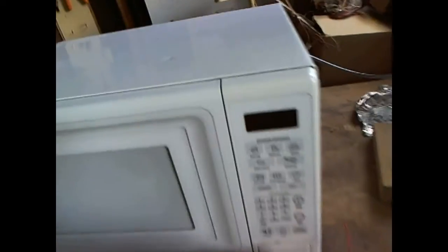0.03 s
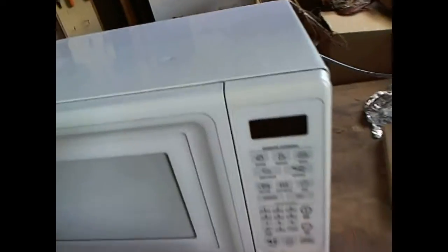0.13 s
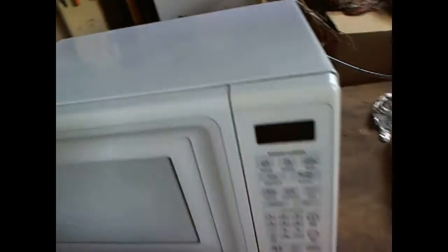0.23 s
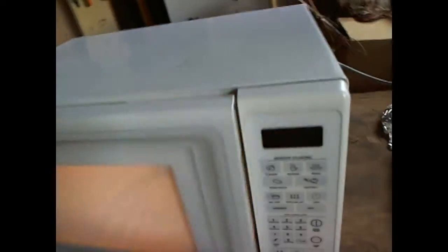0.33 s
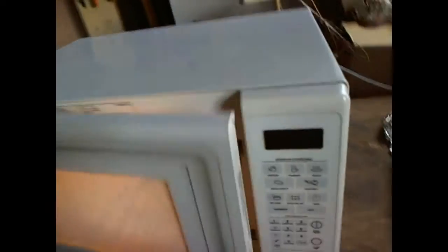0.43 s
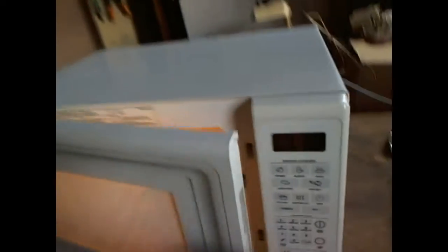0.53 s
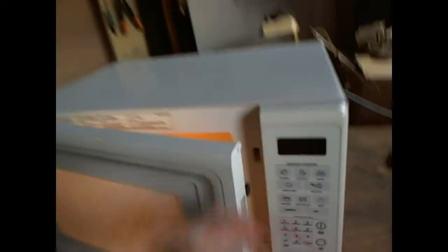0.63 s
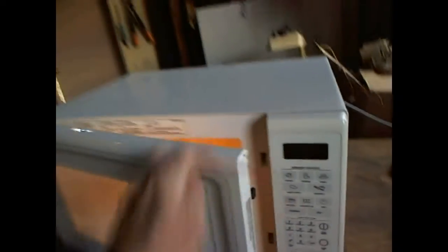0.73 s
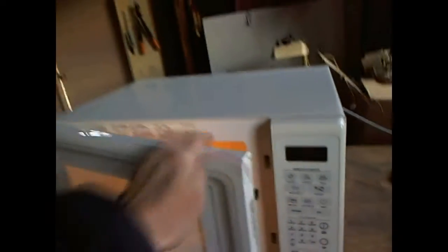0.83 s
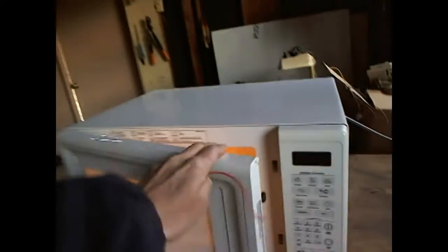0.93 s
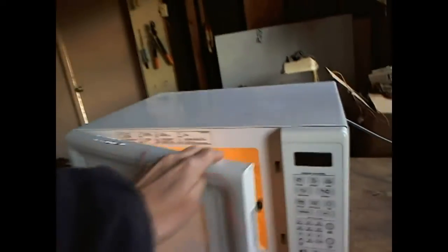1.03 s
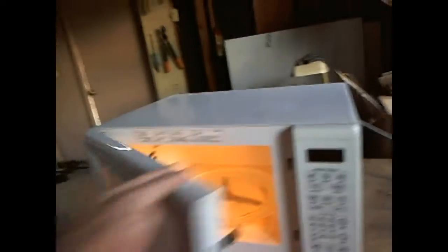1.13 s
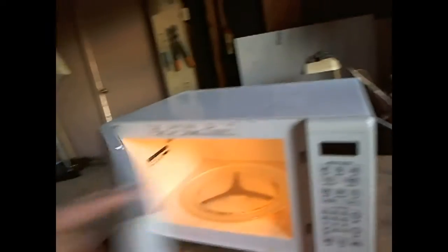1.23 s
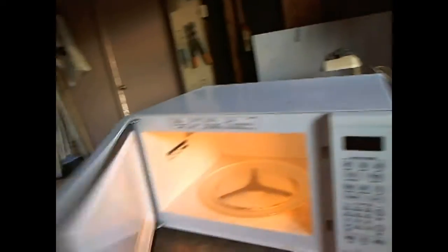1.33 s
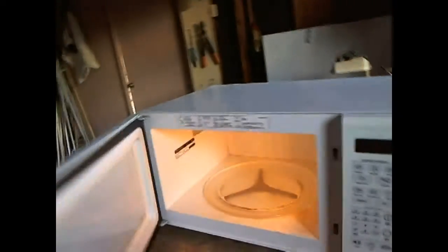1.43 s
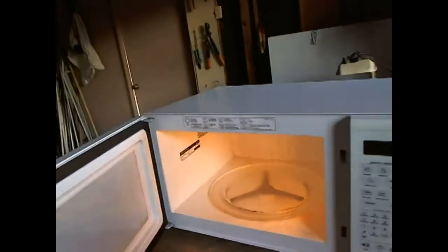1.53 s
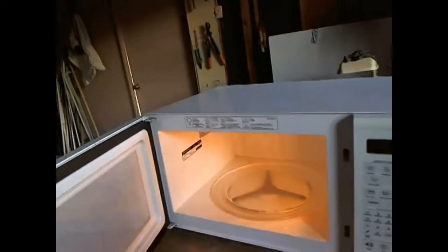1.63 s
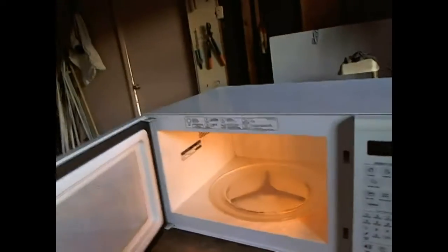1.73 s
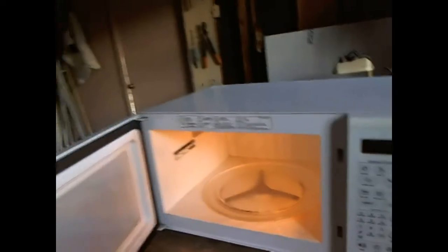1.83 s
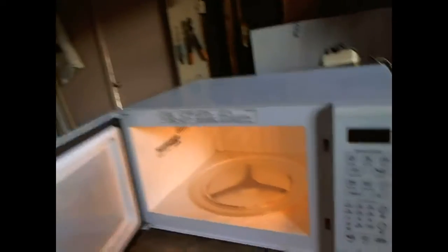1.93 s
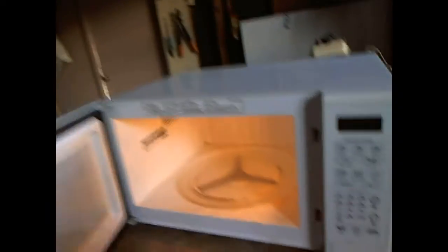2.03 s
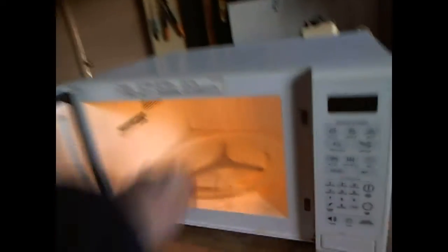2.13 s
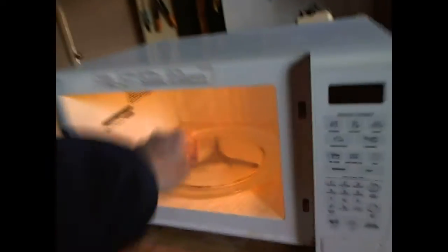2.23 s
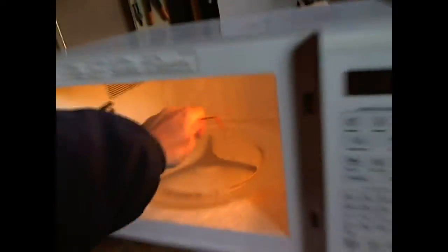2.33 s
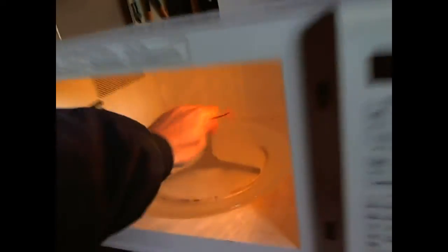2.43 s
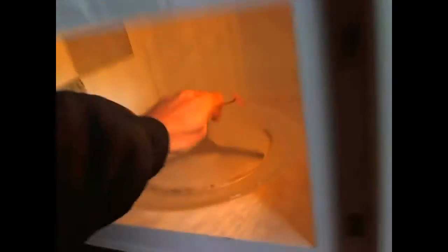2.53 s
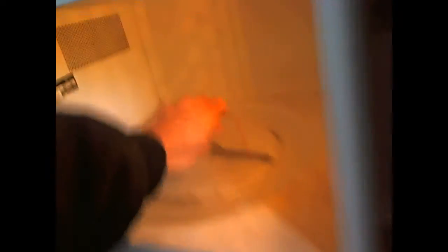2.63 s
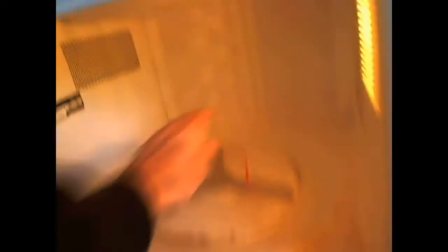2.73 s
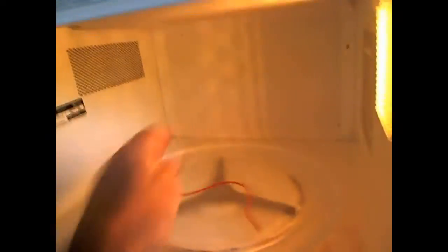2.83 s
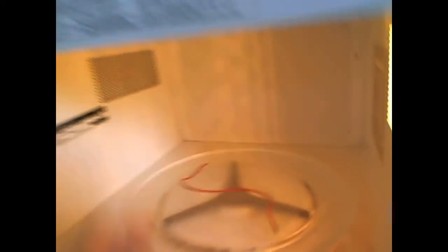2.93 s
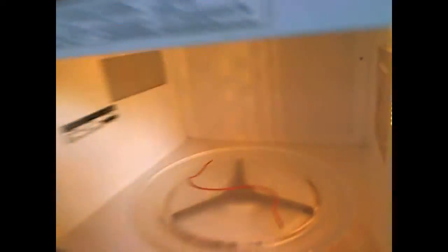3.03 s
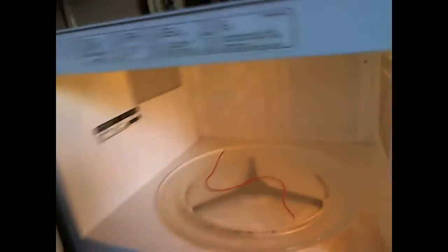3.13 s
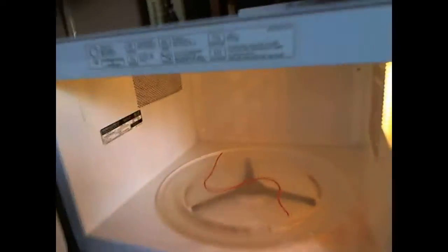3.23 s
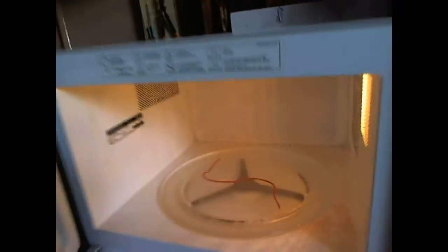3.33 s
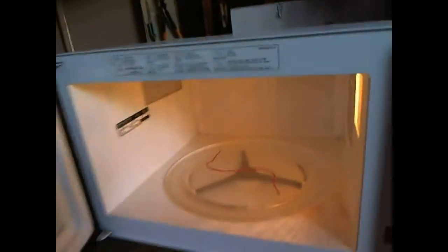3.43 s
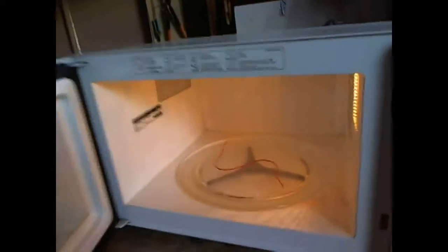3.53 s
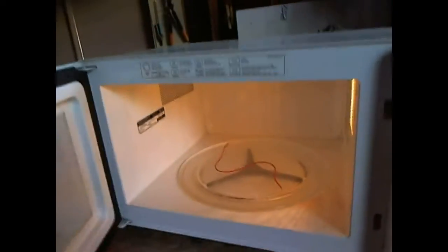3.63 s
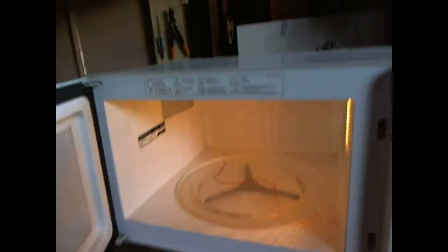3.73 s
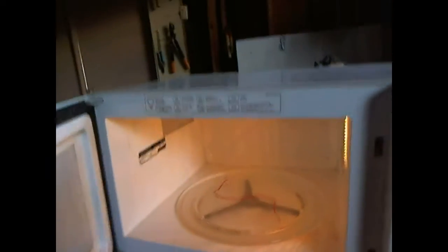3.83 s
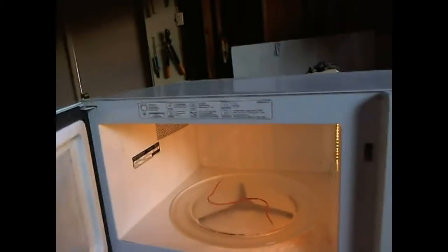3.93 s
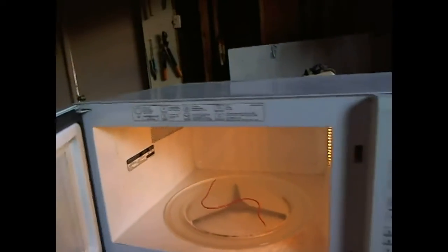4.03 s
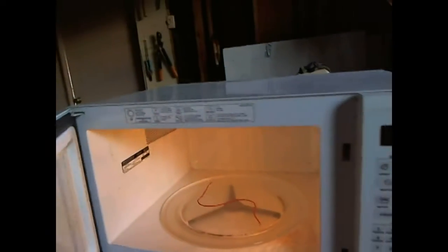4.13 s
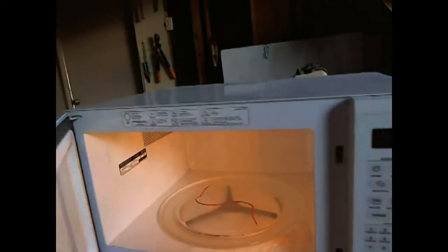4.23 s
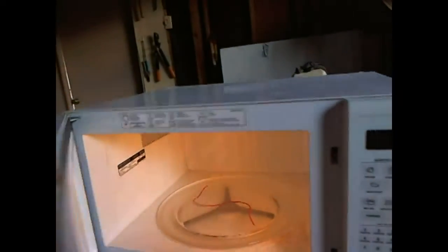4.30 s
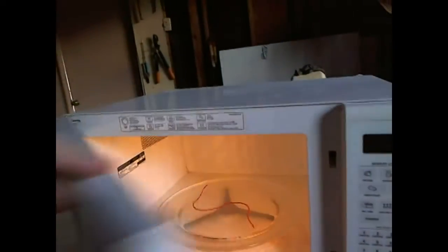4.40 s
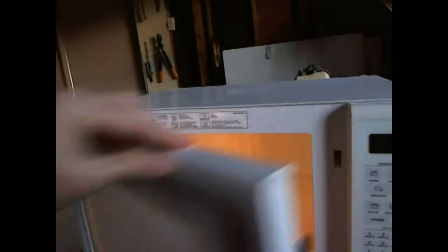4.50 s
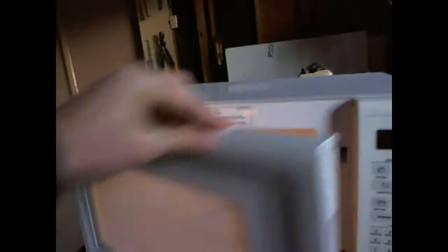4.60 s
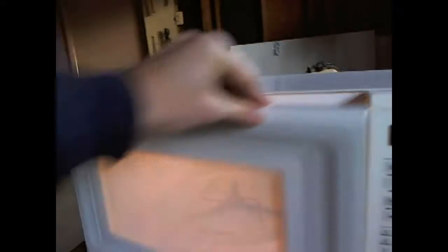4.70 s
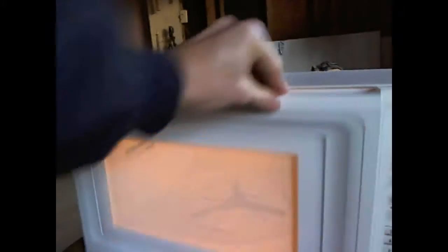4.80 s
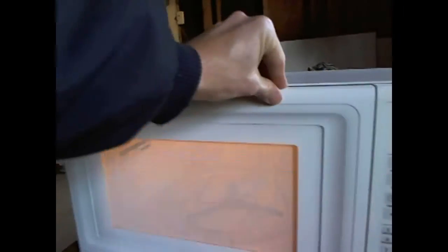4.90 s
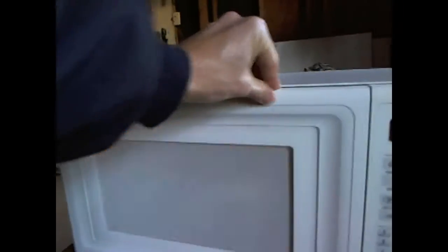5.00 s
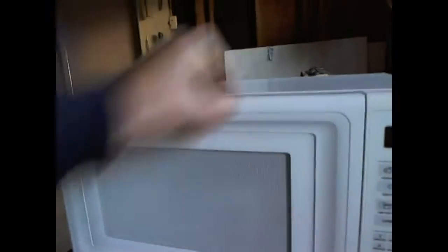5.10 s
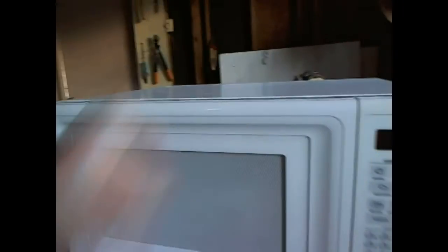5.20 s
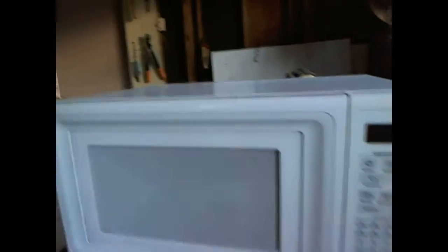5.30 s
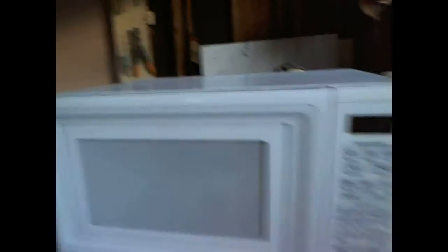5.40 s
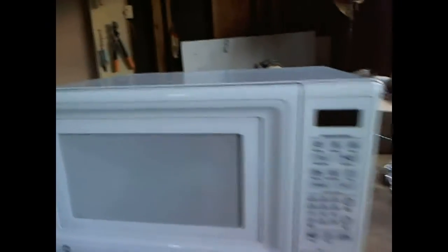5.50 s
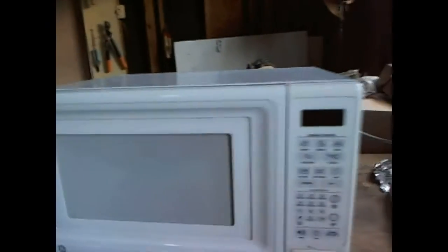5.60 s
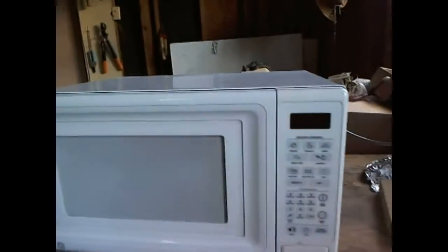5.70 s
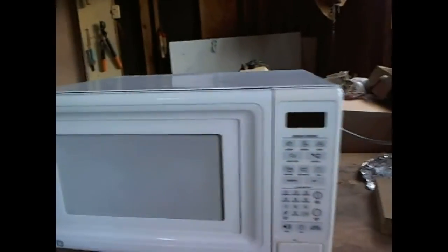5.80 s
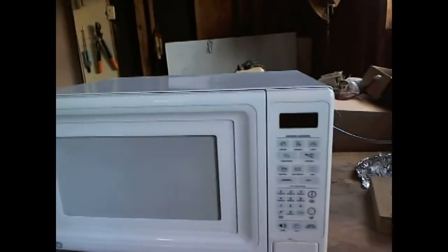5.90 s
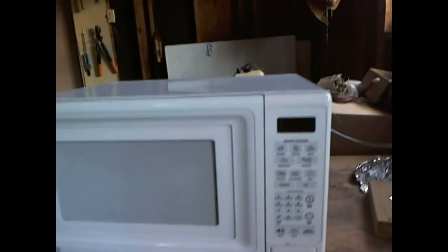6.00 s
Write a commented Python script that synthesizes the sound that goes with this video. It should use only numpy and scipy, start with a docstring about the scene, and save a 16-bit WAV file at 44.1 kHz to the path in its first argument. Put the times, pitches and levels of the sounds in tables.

```python
"""A garage bench with a microwave oven on it, close to a hand-held camera. The latch clicks, squeals and lets
the door spring open; the hinge groans, a hand makes the glass turntable clink, a foot steps back, and the door
is slammed. Knocks are bursts of noise plus ringing tones, squeaks are sliding tones with overtones, and cloth,
handling and the quiet room are coloured noise. The loudest blows overload the microphone."""
import sys
import numpy as np
from scipy import signal
from scipy.fft import rfft, irfft, next_fast_len
from scipy.io import wavfile
from scipy.ndimage import uniform_filter1d

SR = 44100
rng = np.random.default_rng(int(sys.argv[2]) if len(sys.argv) > 2 else 0)


def to_wav(s):
    """Save 16-bit WAV."""
    ch = np.atleast_2d(s).T  # columns
    pcm = np.round(np.clip(ch, -1, 1) * 32767)  # PCM
    wavfile.write(sys.argv[1], SR, pcm.astype(np.int16))


N = 266937
TIME = np.arange(N) / SR  # seconds
RING = TIME[:int(1.5 * SR)]  # time axis of one ringing sound, seconds
RELEASE_S = .619  # the latch hook snaps free

# The many close-packed tones of the oven case, as the colour of a noise.
# Each row: frequency in Hz, relative strength in dB per Hz.
CASE_COLOUR = [(30, -11.5), (80, -7), (160, -1), (330, -2.5), (600, 1), (1080, 2), (1700, -2.5),
               (2400, -4.5), (3600, -4.5), (5300, -8), (7000, -14.5), (10000, -26), (15000, -24.5)]


def undb(db):
    """Turn decibels into a gain."""
    return 10 ** (np.asarray(db) / 20)


def at_hz(table, hz):
    """Read a table of (Hz, value) rows at any frequency, on a logarithmic pitch axis."""
    table_hz, value = np.transpose(table)
    return np.interp(np.log(hz + 1e-9), np.log(table_hz), value)


def colour(x, spectrum, tilt_db=0):
    """Filter by a spectrum, made brighter or duller by a tilt in dB per octave around 1 kHz."""
    hz = np.fft.rfftfreq(len(x), 1 / SR)
    octaves = np.log2(np.clip(hz, 400, 8000) / 1000)  # the tilt stops at 400 and 8000 Hz
    gain = undb(at_hz(spectrum, hz) + tilt_db * octaves)
    return irfft(rfft(x) * gain, len(x))


def noise(spectrum, tilt_db=0, size=N):
    """Make coloured noise with an rms level of 1."""
    x = colour(rng.standard_normal(size), spectrum, tilt_db)
    return x / x.std()


def long_noise(spectrum, tilt_db=0):
    """Make coloured noise as long as the scene, at a length that filters quickly."""
    return noise(spectrum, tilt_db, size=next_fast_len(N))[:N]


def walk(rate):
    """Wander at random with a spread of 1, taking a new value about `rate` times a second."""
    step = int(SR / rate)
    x = np.repeat(rng.standard_normal(N // step + 1), step)
    x = uniform_filter1d(x, step)[:N]
    return x / x.std()


def fade(t60):
    """Die away freely, by 60 dB in t60 seconds."""
    return np.exp(-np.log(1000) * RING / max(t60, 1e-3))


def swell(s, rise, fall):
    """Grow to a gain of 1 at time s and die away again."""
    pace = np.where(TIME < s, rise, fall)
    return np.exp(-np.abs(TIME - s) / np.maximum(pace, 1e-4))


def add(track, s, sound):
    """Mix a sound in at time s."""
    i = int(s * SR)
    track[i:i + len(sound)] += sound[:N - i]


def mode_rings(modes):
    """Ring each natural tone (Hz, dB, t60) of a struck object as a decaying sine."""
    return np.array([undb(db) * fade(t60) * np.sin(2 * np.pi * hz * RING) for hz, db, t60 in modes])


def alternating(count):
    """Give neighbouring tones opposite signs, the same at every blow."""
    return (-1) ** np.arange(count)


def tail():
    """Blur a knock into the smooth echo of case and garage, with energy 1; the treble dies soonest."""
    # How long the echo lasts. Each row: frequency in Hz, t60 in seconds.
    echo_times = [(60, 0.5), (250, .6), (700, .55), (1500, 0.41), (4000, 0.32), (10000, .26)]
    hz = np.fft.rfftfreq(len(RING), 1 / SR)
    white = rfft(rng.standard_normal(len(RING)))
    centres, t60s = np.transpose(echo_times)
    echo = np.zeros(len(RING))
    for row, t60 in zip(np.eye(len(centres)), t60s):
        share = at_hz(np.c_[centres, row], hz)  # overlapping bands that add up to 1
        echo += irfft(white * share, len(RING)) * fade(t60)
    echo = echo * (1 - np.exp(-RING / 0.00093))  # soft start
    return echo / np.linalg.norm(echo)


def garage(x, wet_db):
    """Add the echo of case and garage to the direct sound."""
    return x + undb(wet_db) * signal.fftconvolve(x, tail())[:N]


def door():
    """Crack the plastic and ring the steel at every contact, as latch and door open and slam."""
    # Sheet-steel panels and oven cavity. Each row: frequency in Hz, relative level in dB, t60 in seconds.
    panel_modes = [(111, -14, .75), (223, -14, 1.0), (227, -19, .9), (246, -22, .75), (280, -27, .6),
                   (353, -21, .7), (373, -24, .7), (436, -18, .55), (491, -20, .7), (506, -11, .3),
                   (529, -23, .7), (548, -19, .7), (582, -16, .3), (653, -19, .9), (697, -24, .75),
                   (764, -15, .3), (915, -24, .55), (2772, -39, .9), (4027, -45, .9), (5001, -46, .9)]
    panels = undb(-2) * alternating(len(panel_modes)) @ mode_rings(panel_modes)
    click_cracks, click_rings = clicks(panels)
    blow_cracks, blow_rings = blows(panels)
    rings = click_rings + blow_rings + bench_jolts() + hook_and_spring()
    return garage(click_cracks + blow_cracks, wet_db=-10.5) + rings


def blows(panels):
    """Let heavy contacts scrape in, crack, thud in the hollow case, ring the panels and rattle."""
    # The latch gives, the door springs out and jumps, the hook snaps free; the hooks meet the case,
    # the door slams home. Each row: start in seconds, level in dB, brightness in dB per octave,
    # t60 of the crack in seconds, panel ring, thud and rattle in dB relative to the level,
    # rise of the scrape before it in seconds.
    heavy_blows = [(.479, -8.5, 1, .09, -14.5, -20, -12, .003),
                   (.493, -8, -1, .14, -17.5, -15.5, -14.5, .001),
                   (.551, -14, -4.5, .09, -6.5, -12, -10, .002),
                   (.619, -1.5, 0.5, .055, -19.5, -27, -15.5, .021),
                   (4.989, -10.5, 0.5, .1, -3, -9, -8, .0002), (5.053, 2, -1, 0.17, 3.5, -8, -7.5, .005)]
    cracks, rings = np.zeros(N), np.zeros(N)
    grain = undb(4 * walk(300))
    scrape = undb(-9) * grain * long_noise(CASE_COLOUR, tilt_db=-1.5)  # the hook sliding up to a blow
    for s, db, tilt_db, t60, ring_db, thud_db, rattle_db, rise in heavy_blows:
        cracks += undb(db) * swell(s, rise, 0) * scrape
        add(cracks, s, crack(db, tilt_db, t60))
        add(cracks, s, crack(db + thud_db, tilt_db=-11.5, t60=0.34, rise=.004))
        add(rings, s, undb(db + ring_db) * panels)
        for knock_s, knock_db, knock_tilt_db in rebounds(s, db + rattle_db, tilt_db):
            add(cracks, knock_s, crack(knock_db, knock_tilt_db, t60=.07, size=8192))
    return cracks, rings


def crack(db, tilt_db, t60, rise=.0003, size=16384):
    """Set the close-packed tones of the case going with one contact: a quickly fading noise."""
    envelope = fade(t60) * (1 - np.exp(-RING / rise))
    return undb(db) * noise(CASE_COLOUR, tilt_db, size=size) * envelope[:size]


def rebounds(s, db, tilt_db, count=9):
    """Rattle the door after a blow: uneven, ever weaker and duller knocks (s, dB, brightness)."""
    gap_s, gap_spread, scatter_db = .018, .2, 1.0  # the spread is in gaps
    weaken_db_per_s, dull_db_per_s = -140, -56  # the second one changes the brightness
    chance = rng.standard_normal((count, 2))
    late = gap_s * np.maximum(np.arange(1, count + 1) + gap_spread * chance[:, 0], 0)
    return [(s + t, db + weaken_db_per_s * t + scatter_db * luck, tilt_db + dull_db_per_s * t)
            for t, luck in zip(late, chance[:, 1])]


def clicks(panels):
    """Knock the case lightly, so that it cracks softly and rings the panels a little."""
    # Knocks from button, lever and fingers, dull late knocks of the opened door, and the glass plate
    # landing. Each row: start in seconds, level in dB, brightness in dB per octave, t60 in seconds.
    light_knocks = [(.114, -38, -4.5, 0.078), (.222, -36, -1.5, 0.064), (.236, -15.5, -5, 0.059),
                    (.259, -21, -3.5, 0.043), (.325, -32.5, -3, 0.052), (0.346, -32, -.5, .07),
                    (.357, -14, -1, 0.062), (.386, -29, -4.5, 0.096), (.403, -16.5, 0.5, .045),
                    (.414, -18.5, 5, .035), (.432, -16.5, 2.5, 0.044), (.674, -20.5, -11, 0.043),
                    (.732, -26.5, -12.5, 0.045), (2.416, -30, 0.5, .025), (2.852, -19, -3.5, .06),
                    (4.022, -37, 1, .01)]
    cracks, rings = np.zeros(N), np.zeros(N)
    for s, db, tilt_db, t60 in light_knocks:
        add(cracks, s, crack(db, tilt_db, t60, rise=0.041 * t60))
        add(rings, s, undb(db - 13) * panels)
    return cracks, rings


def bench_jolts():
    """Rock the whole oven on the bench, which answers with low ringing tones."""
    # Each row: start in seconds, level in dB.
    jolts = [(.474, -21.5), (.553, -16), (.598, -19), (5.048, -9), (5.122, -9), (5.147, -9.5)]
    # The bench's own tones. Each row: frequency in Hz, relative level in dB, t60 in seconds.
    bench_modes = [(62.4, -8.5, .27), (112.1, -6.5, 0.042), (129.4, -6, 0.21), (186, -9, .16)]
    out, bench = np.zeros(N), mode_rings(bench_modes).sum(axis=0)
    for s, db in jolts:
        add(out, s, undb(db) * bench)
    return out


def hook_and_spring(spring_db=-42, spring_hz=544, spring_t60=5.0):
    """Ring the latch hook as it snaps back, and let the door spring sing on after the release."""
    # The latch hook. Each row: frequency in Hz, relative level in dB, t60 in seconds.
    hook_modes = [(1076, -9, 0.08), (3400, -11.5, 0.065), (5340, -7, 0.055)]
    out = np.zeros(N)
    add(out, RELEASE_S, undb(-1) * mode_rings(hook_modes).sum(axis=0))
    spring_gain = undb(spring_db - 60 * TIME / spring_t60)
    add(out, RELEASE_S, spring_gain * np.sin(2 * np.pi * spring_hz * TIME))
    return out


def turntable(place_db=3, rock_db=1.2):
    """Knock glass on its rollers at changing spots; each contact drives its own range of tones."""
    # The glass plate. Each row: frequency in Hz, relative level in dB, t60 in seconds if left undamped.
    glass_modes = [(506, -17, .27), (786, -22, .12), (1134, -15, .46), (1969, -17, .42), (1989, -24, .25),
                   (2385, -42, .3), (3388, -30, .2), (4222, -21, .25), (4395, -20, .32), (4545, -22.5, .25),
                   (5548, -25, .25), (5811, -25, .45), (6121, -23, .25), (6800, -29, .12), (7030, -25, .22),
                   (7370, -33, .2), (8016, -26, .13), (8690, -25, .13), (9060, -35, .12), (9665, -33, .13),
                   (9970, -29, .16), (10470, -28, .12), (11600, -28, .1), (12090, -24, .15),
                   (12400, -30, .14), (13400, -24, .1)]
    # The plastic roller ring under it. Each row: frequency in Hz, relative level in dB, t60 in seconds.
    roller_modes = [(2950, -7, .08), (3060, 0, .12), (3125, -5, .08)]
    # The plate rocks. Each row: start in seconds, glass level in dB, lowest pitch driven in Hz,
    # brightness in dB per octave, t60 of the contact's damping in seconds, roller level in dB.
    clinks = [(2.667, -13, 1400, -3.5, 0.29, -25), (2.705, -19, 700, 0, .4, -38.5),
              (2.771, -18.5, 2000, -4, 0.93, -27.5), (2.835, 6, 1660, 3, 0.15, -12.5),
              (2.851, 3, 400, 2, 2.5, -40), (2.915, -9, 1300, 0, 0.32, -26),
              (2.990, 0.5, 2550, 0.5, .7, -15)]
    ringing, ticks = np.zeros(N), np.zeros(N)
    hz = np.array(glass_modes)[:, 0]
    # each tone wavers as the plate rocks
    waver = np.array([walk(81)[:len(RING)] for _ in hz])
    glass = mode_rings(glass_modes) * undb(rock_db * waver)
    rollers = mode_rings(roller_modes).sum(axis=0)
    contact = 1 - np.exp(-RING / 0.0014)  # soft start
    spots = rng.random((len(clinks), len(hz))) - .5  # where the plate is touched
    for (s, db, lowest_hz, tilt_db, t60, rollers_db), spot in zip(clinks, spots):
        high_pass = 1 / np.hypot(1, (lowest_hz / hz) ** 3)
        strength = undb(db + tilt_db * np.log2(hz / 3000) + place_db * spot)
        drive = alternating(len(hz)) * high_pass * strength
        add(ringing, s, contact * (drive @ glass * fade(t60) + undb(rollers_db) * rollers))
        tick = noise(CASE_COLOUR, tilt_db=0.5 + tilt_db, size=len(RING))
        add(ticks, s, undb(db - 24) * contact * fade(0.094) * tick)
    return ringing + garage(ticks, wet_db=-2.5)


def squeaks():
    """Drag the latch hook over its catch, groan the hinge, and judder a sole turning on the floor."""
    # Each row: start in seconds, attack in seconds, time to the peak in seconds, peak level in dB,
    # swell in dB per second, release in dB per second, first pitch in Hz, last pitch in Hz,
    # middle of the slide in seconds after the start, slide time in seconds.
    slips = [(.424, .008, 0.05, -7.5, 190, 430, 1661, 1494, .040, 0.0089),
             (1.122, .01, 0.048, -31, 325, 202, 408, 384.7, 0.016, 0.0089),
             (3.979, 0.0083, 0.013, -33, 18, 171.5, 1110, 1240, 0.0201, .028)]
    # Overtones of the latch. Each row: multiple of the pitch, relative level in dB.
    latch_tones = [(1, 0.5), (2, -2.5), (3, -9), (4, -12), (5, -24.5), (6, -26)]
    # Overtones of the hinge. Each row: multiple of the pitch, relative level in dB.
    hinge_tones = [(1, -1.5), (2, -3.5), (3, -8), (4, -18.5), (5, -28)]
    # Overtones of the sole. Each row: multiple of the pitch, relative level in dB.
    shoe_tones = [(1, -2.5), (2, -9)]
    latch = squeak(slips[0], latch_tones, jitter=0.008, flutter_db=1.1, edge=.15, rasp_db=-17.5, body_db=14)
    hinge = squeak(slips[1], hinge_tones, jitter=0.014, flutter_db=3.0, edge=.05, rasp_db=-29)
    shoe = squeak(slips[2], shoe_tones, jitter=0.0259, flutter_db=4.5, edge=1.6, rasp_db=-23.5, chatter=0.46)
    return garage(latch, wet_db=-19.5) + garage(hinge, wet_db=-10.0) + garage(shoe, wet_db=-13)


def squeak(event, tones, jitter, flutter_db, edge, rasp_db, chatter=0, chatter_hz=67,
           body_db=0, body_hz=3020, body_width_hz=110):
    """Stick and slip: a raspy tone swells, slides in pitch and lets go; force brings out overtones."""
    start, attack, to_peak, db, swell_db, release_db, first_hz, last_hz, middle, slide = event
    age = TIME - start
    slid = (1 + np.tanh((age - middle) / slide)) / 2  # from 0 to 1
    hz = (first_hz + (last_hz - first_hz) * slid) * (1 + jitter * walk(900))  # unsteady slips
    phase = 2 * np.pi * np.cumsum(hz) / SR
    slope_db = np.where(age < to_peak, swell_db, release_db)
    force = np.clip(age / attack, 0, 1) * undb(db - np.abs(age - to_peak) * slope_db)
    force = force * (1 - chatter * np.cos(2 * np.pi * chatter_hz * age))
    press = force / force.max()
    tone = np.zeros(N)
    for k, tone_db in tones:
        # only hard rubbing wakes the resonance
        boost_db = np.sqrt(press) * body_db / (1 + ((k * hz - body_hz) / body_width_hz) ** 2)
        gain = undb(tone_db + boost_db + flutter_db * np.sqrt(k) * walk(300))
        tone += gain * press ** (edge * np.log2(k)) * np.sin(k * phase)
    return force * (tone + undb(rasp_db) * long_noise(CASE_COLOUR, tilt_db=2.5))


def body():
    """Hear the person move: footfalls and brushes, with the echo of the garage."""
    return garage(footfalls() + scuffs(), wet_db=-9.5)


def footfalls():
    """Ring the floor's low tones softly under each step."""
    # Each row: start in seconds, level in dB.
    steps = [(2.573, -39), (3.773, -30), (3.798, -23.5)]
    # The floor underfoot. Each row: frequency in Hz, relative level in dB, t60 in seconds.
    floor_modes = [(120, -21, 0.33), (205, -7, 0.076), (229, -3.5, 0.21), (275, -8, 0.053),
                   (362, -11.5, 0.087), (531, -15.5, .18), (586, -27.5, .18)]
    out, thud = np.zeros(N), mode_rings(floor_modes).sum(axis=0)
    for s, db in steps:
        add(out, s, undb(db) * thud)
    return out


def scuffs():
    """Brush cloth and sole along a surface, and thud dully under the step: swelling, grainy noise."""
    # Each row: peak time in seconds, rise in seconds, fall in seconds, level in dB,
    # brightness in dB per octave.
    scuff_rows = [(2.25, 0.075, 0.051, -45.5, 8), (2.60, 0.065, 0.053, -39.5, -4),
                  (3.164, 0.06, 0.022, -29.5, 2.5), (3.774, .0005, 0.014, -39.5, -3.5),
                  (3.794, 0.0083, 0.014, -35, 1.5), (3.801, 0.0041, 0.0265, -36.5, -18),
                  (3.988, 0.0071, 0.013, -42, -13)]
    out, grain = np.zeros(N), undb(2 * walk(210))
    for s, rise, fall, db, tilt_db in scuff_rows:
        out += undb(db) * swell(s, rise, fall) * grain * long_noise(CASE_COLOUR, tilt_db)
    return out


def sleeves():
    """Rub the sleeve as the arm moves: grainy cloth noise, one swell for each stroke."""
    # Each row: peak time in seconds, rise in seconds, fall in seconds, relative level in dB.
    strokes = [(.06, 0.33, 0.15, -44), (.98, 0.25, 0.2, -50.5), (1.29, 0.033, .17, -53),
               (1.969, .05, .2, -61.5), (2.479, 0.34, .25, -48), (3.289, 0.13, 0.44, -46.5),
               (4.462, 0.099, .1, -63.5), (4.92, 0.17, 0.08, -57), (5.661, 1, 0.45, -50.5),
               (6.04, 0.036, .1, -55)]
    # Colour of rubbed cloth. Each row: frequency in Hz, relative strength in dB.
    cloth_colour = [(200, 4.5), (600, 10), (1200, 6), (2300, -1), (4400, 1.5), (6000, -2), (7500, -6),
                    (10000, -13.5), (14000, -12)]
    power = sum((undb(db) * swell(s, rise, fall)) ** 2 for s, rise, fall, db in strokes)
    return np.sqrt(power) * undb(2.5 + 0.87 * walk(80)) * long_noise(cloth_colour)


def handling():
    """Rumble the camera in the hand: a wavering low noise that grows as the camera is swung."""
    # Swings of the camera. Each row: peak time in seconds, level in dB.
    swing_peaks = [(.85, -45), (1.65, -43), (2.61, -37), (3.098, -44)]
    # Colour of the rumble. Each row: frequency in Hz, relative strength in dB.
    rumble_colour = [(20, -6.5), (45, -2.5), (72, 3), (100, -6.5), (150, -2), (250, -10.5), (400, -19),
                     (900, -22), (3000, -49)]
    swings = sum(undb(db) * swell(s, rise=0.054, fall=0.12) for s, db in swing_peaks)
    steady = undb(-52 + 2 * walk(6.6))
    return np.hypot(steady, swings) * long_noise(rumble_colour)


def room_air():
    """Hiss faintly and steadily, as a quiet room does."""
    # Colour of the room's air. Each row: frequency in Hz, relative strength in dB.
    air_colour = [(120, -32), (200, -1), (432, -13.5), (543, -0.5), (609, -18.5), (979, -12),
                  (10000, -27.5), (13000, -63), (22000, -120)]
    return undb(-59) * long_noise(air_colour)


def scene():
    """Bring everything together at the one microphone."""
    return (door() + turntable() + squeaks() + body() + sleeves() + handling() + room_air())[None]


def record(dry):
    """Dull the top and clip at full scale in the microphone; dull and cut the treble in the recorder."""
    # What the microphone passes. Each row: frequency in Hz, gain in dB.
    microphone_gain = [(20, -4), (45, -1.5), (62, 2), (110, 2), (9000, 0.5), (10200, -3.5), (11000, -14),
                       (13000, -13), (14000, -38), (20000, -61)]
    # What the recorder passes. Each row: frequency in Hz, gain in dB.
    recorder_gain = [(10000, -0.5), (12000, -5), (16000, -17)]
    clipped = np.clip(colour(dry[0], microphone_gain), -1, 1)
    low_pass = signal.ellip(8, .1, 70, 16000, fs=SR, output="sos")  # steep cut at 16 kHz
    return signal.sosfilt(low_pass, colour(clipped, recorder_gain))[None]


dry = scene()
out = record(dry)
to_wav(out)
```